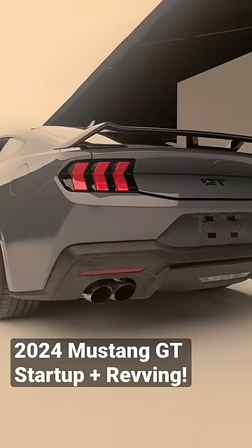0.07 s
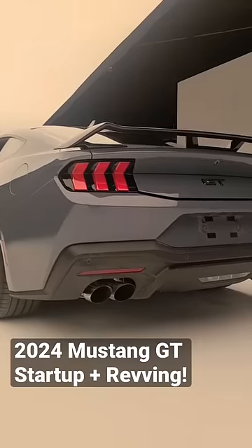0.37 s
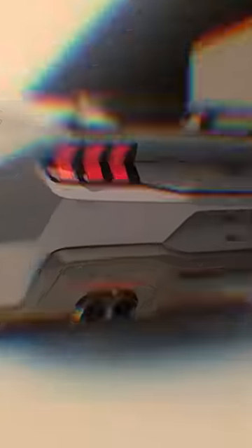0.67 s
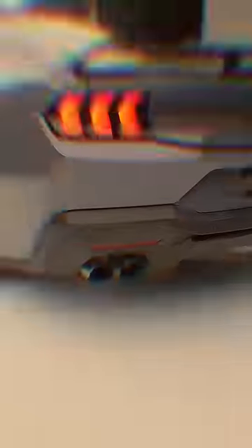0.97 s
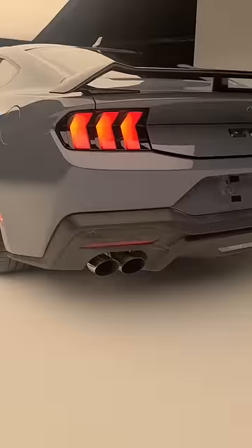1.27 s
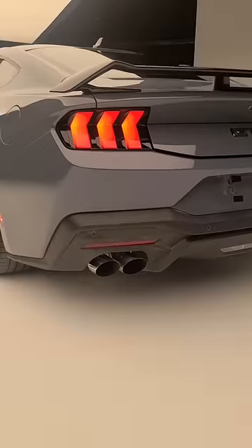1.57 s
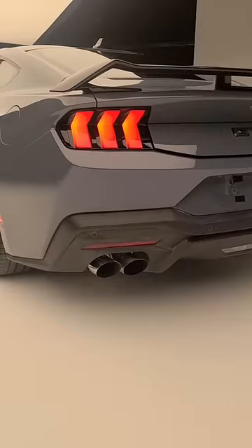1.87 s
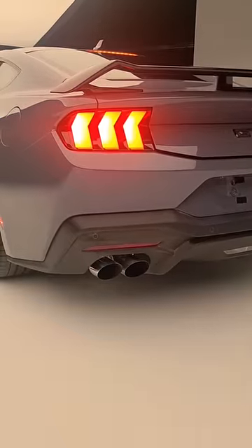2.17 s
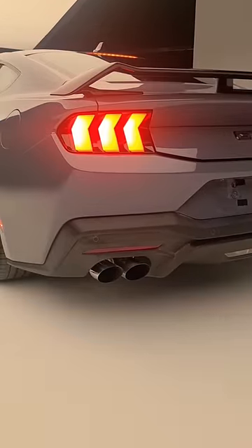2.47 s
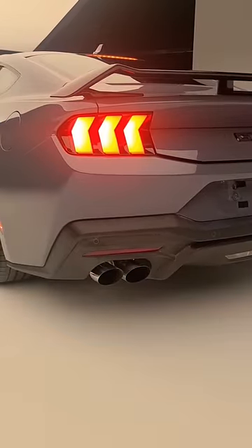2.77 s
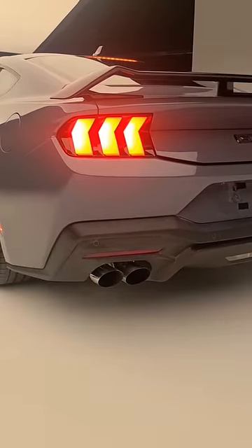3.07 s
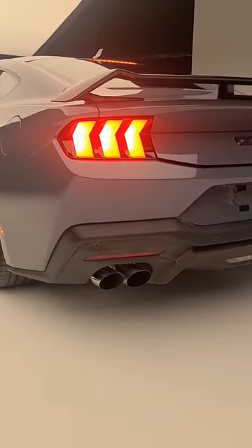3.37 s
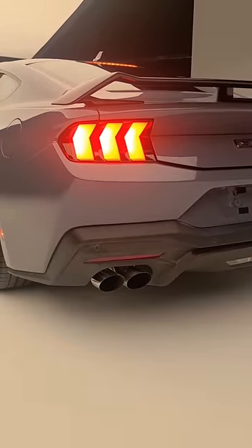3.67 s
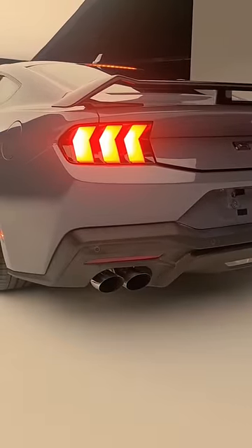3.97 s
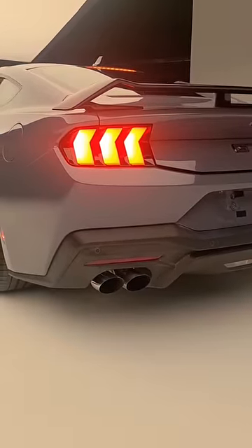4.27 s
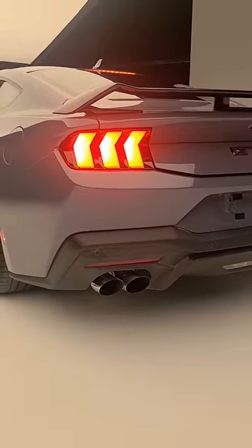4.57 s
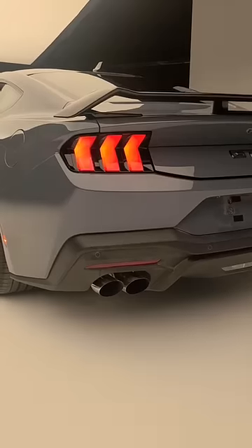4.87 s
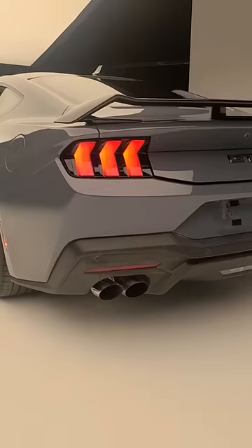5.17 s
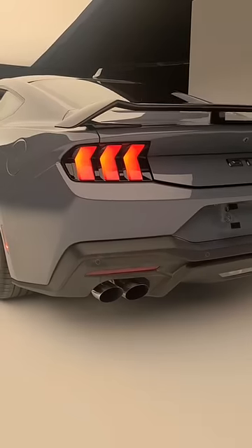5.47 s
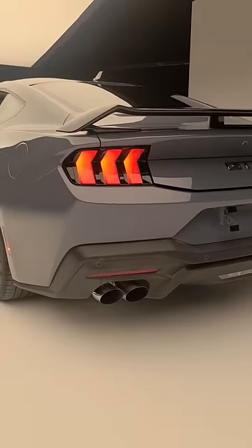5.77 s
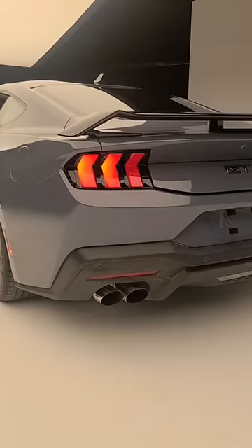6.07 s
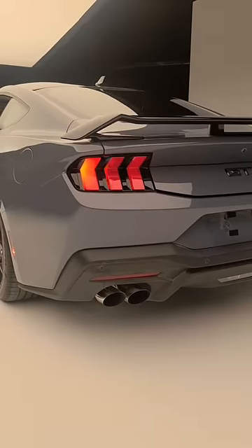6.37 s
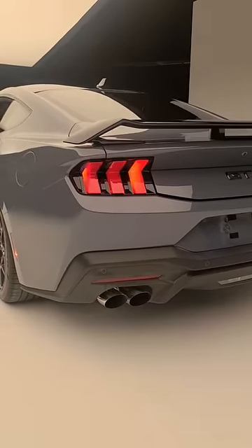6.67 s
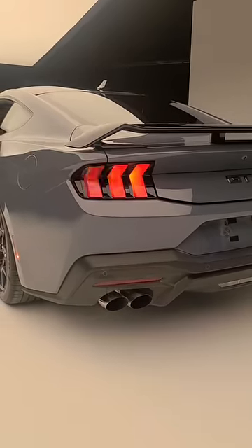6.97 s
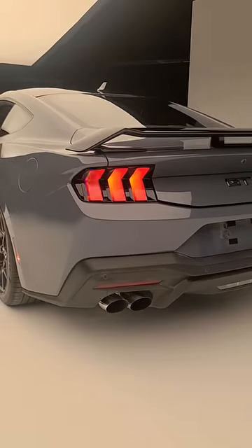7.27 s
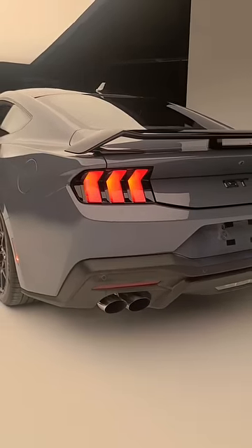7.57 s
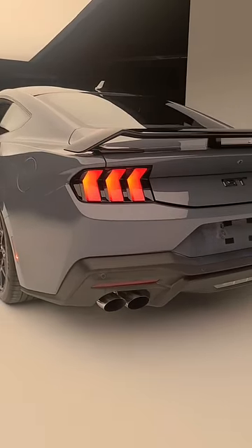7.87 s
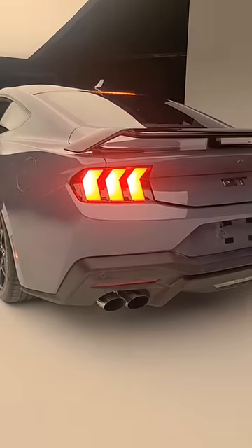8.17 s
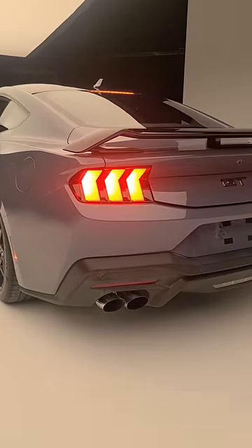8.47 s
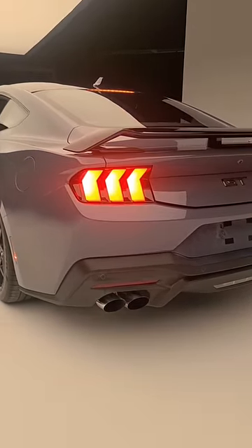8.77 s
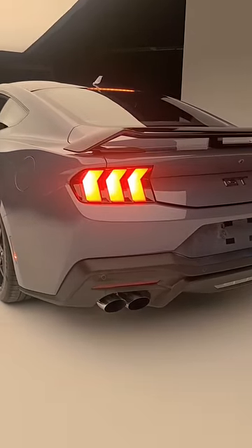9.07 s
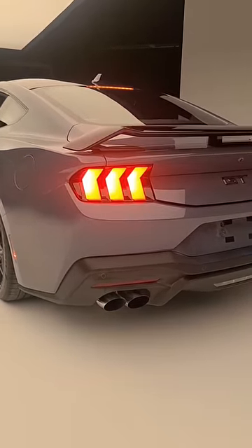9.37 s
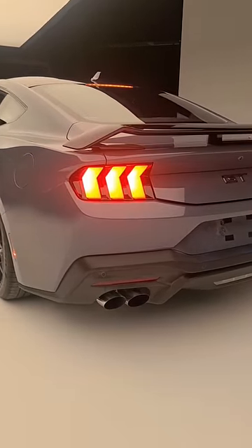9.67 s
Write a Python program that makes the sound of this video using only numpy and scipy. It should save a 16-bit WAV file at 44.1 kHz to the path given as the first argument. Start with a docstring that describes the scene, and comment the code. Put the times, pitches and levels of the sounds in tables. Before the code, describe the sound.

Heard from just behind the tailpipes indoors, a big car engine roars through three revs, each winding down with burbles and sharp pops.

```python
"""In a large hall, a V8 car is heard from just behind its tailpipes.
Its cold idle gives way to three revs, the second with a double press of the pedal. After each rev
the engine coasts down, burbling and popping. The pedal sets the engine's speed and load (how hard
it works), and these set how loud and how even the exhaust is. Uneven firing pulses make the
exhaust pipes ring, gas hisses out under load, and the hall echoes."""
import sys
import numpy as np
from scipy import signal
from scipy.fft import rfft, irfft
from scipy.io import wavfile
from scipy.ndimage import uniform_filter1d

SR = 44100
rng = np.random.default_rng(int(sys.argv[2]) if len(sys.argv) > 2 else 0)


def unload_wav(signal):
    """Save mono or channel-first audio to the path in sys.argv[1] as 16-bit WAV at rate SR, clipped to [-1, 1]."""
    wavfile.write(
        sys.argv[1],
        SR,
        np.round(np.clip(np.atleast_2d(signal).T, -1, 1) * 32767).astype(np.int16),
    )


N = 437913
TIME = np.arange(N) / SR

# Engine speed is counted in cycles per second (Hz). In one cycle, all eight cylinders fire once.
# Pedal presses: pressed_s, released_s, top_speed_hz, slowing_hz_per_s, effort_db, run_down_db,
# starting_pressure (0-1), engine_delay_s
PRESSES = [(1.185, 1.683, 43.5, 12.5, 0, 2, 0, 0.032), (5.836, 6.098, 14.4, 1.025, -1, 6.5, .2, 0),
           (6.192, 6.637, 33, 6, 0, 1.5, 0.65, 0), (7.055, 7.559, 50.4, 13.1, -0.5, 4, 0, .045)]
# The warm idle, the lowest speed the engine is allowed to fall to: time_s, speed_hz
WARM_IDLE_SPEED = [(4.9, 8.66), (5.4, 8.48)]
# The cylinders in firing order, the four on the near side strongest: strength_db, extra_travel_s
CYLINDER_PULSES = [(5.5, 0.0026), (-6, 0.0011), (0.5, 0.00055), (2.5, 0.0012), (-6.5, 0.00068),
                   (1.5, 0.00085), (-10.5, 0.0014), (-8, 0.0026)]
# Tone colours, which say how strong each pitch is in a sound: pitch_hz, level_db
DRONE_COLOUR = [(40, -26.5), (70, -3), (100, 0), (135, -3), (170, 1.5), (230, 1), (262, -11), (290, -18.5),
                (420, -40), (2000, -100)]  # the muffler's low hum
BARK_COLOUR = [(200, -27), (290, -12.5), (335, -0.5), (400, 1.5), (460, -8), (530, -8), (610, -11.5),
               (690, -14), (790, -32), (3000, -87.5)]  # the exhaust's middle voice
RASP_COLOUR = [(400, -36.5), (600, 1.5), (790, -8), (990, 4.5), (1150, -9), (1270, -0.5), (1390, 2.5),
               (1480, -3), (1620, -16), (1790, -4), (2020, -26.5), (2250, -15.5), (2700, -34), (5000, -35),
               (11000, -74.5)]  # ringing tailpipes
HISS_COLOUR = [(800, 1), (2000, 4.5), (3000, 2), (4300, 3.5), (6000, -2.5), (7500, -9.5), (9500, -5),
               (11800, 4.5), (13500, -0.5), (15500, -4), (16200, -14)]  # escaping gas
FLAME_COLOUR = [(300, -22.5), (800, -8.5), (1300, 11), (1750, -2), (2250, -3.5), (2700, -11.5), (3500, -9),
                (5500, -32), (9000, -34)]  # fuel burning in the pipe


def amp(db):
    """Turns decibels into a number to multiply a sound by."""
    return 10 ** (np.asarray(db) / 20)


def curve(rows, at=TIME, column=1):
    """Reads a table's column smoothly, by time or by another control."""
    rows = np.asarray(rows)
    return np.interp(at, rows[:, 0], rows[:, column])


def at_pitch(points, hz):
    """Reads a table by pitch, with the octaves evenly spaced."""
    pitch_hz, value = np.transpose(points)
    return np.interp(np.log(hz + 1), np.log(pitch_hz + 1), value)


def ramp(start_s, length_s):
    """Rises from 0 to 1 and stays there."""
    return np.clip((TIME - start_s) / length_s, 0, 1)


def unit(x):
    """Scales a sound to an average power of 1."""
    return x / np.sqrt(np.mean(x ** 2) + 1e-20)


def steady(x, size=4000):
    """Evens out slow changes in level; single pulses keep their shape."""
    power = np.mean(np.atleast_2d(x) ** 2, axis=0)
    smoothed = abs(uniform_filter1d(uniform_filter1d(power, size), size))
    return x / np.sqrt(smoothed + 1e-6 * power.mean())


def ring(x, colour, size=8192):
    """Gives a sound a tone colour, the way a pipe rings after a knock."""
    log_gain = np.log(amp(at_pitch(colour, abs(np.fft.fftfreq(size, 1 / SR)))))
    response = np.fft.ifft(np.exp(np.conj(signal.hilbert(log_gain)))).real[:size // 2]
    response = response / np.linalg.norm(response)
    return signal.oaconvolve(np.atleast_2d(x), response[None], axes=1)[:, :N]


def turbulence():
    """Swirling gas: white noise, half of it shared by both ears."""
    common, left, right = rng.standard_normal((3, N))
    return unit(common + np.array([left, right]))


def hall_echo():
    """Scattered reflections fade, each pitch at its own rate; the bass is alike at both ears."""
    # Time the echo takes to fall by 60 dB: pitch_hz, fade_s
    fade_times = [(60, 1.57), (300, 1.1), (1500, 0.3), (4000, 0.02), (8000, 0.43), (15000, 0.04)]
    # What differs between the ears, against what they share: pitch_hz, level_db
    width = [(50, -52), (150, -30.5), (350, -15.5), (700, -4), (2000, -11), (16000, -2.5)]
    reflections = rng.standard_normal((2, SR)) * (rng.random((2, SR)) < .06) * (TIME[:SR] > .004)
    hz, t, spectra = signal.stft(reflections, SR, nperseg=512)
    mid, side = spectra * amp(-60 * t / at_pitch(fade_times, hz)[:, None])
    side = side * amp(at_pitch(width, hz))[:, None]
    tail = signal.istft(np.array([mid + side, mid - side]), SR, nperseg=512)[1]
    tail *= 1 + 1.4 * np.exp(-TIME[:tail.shape[1]] / 0.015)  # floor and car body answer first
    return tail / np.linalg.norm(tail[0])


def place(x, hall, echo_db):
    """The direct sound reaches the left ear first; the hall's echo follows."""
    direct = np.vstack([x[0], np.pad(x[-1], (6, 0))[:N]])
    return direct + amp(echo_db) * signal.oaconvolve(x, hall, axes=1)[:, :N]


def air_whistle():
    """A faint, high whistle of air during the last run-down."""
    # The whistle's colour: pitch_hz, level_db
    colour = [(9000, -49), (11600, -13.5), (12450, -2.5), (13400, -14), (16000, -40)]
    return amp(-54) * ramp(9.3, 0.16) * unit(ring(rng.standard_normal((2, N)), colour))


def machine_whirr(cycle_hz):
    """Moving parts whirr louder as the engine speeds up."""
    # The whirr's colour: pitch_hz, level_db
    colour = [(300, -6), (1000, 9), (2400, -1.5), (3400, -3.5), (4500, -10.5), (6000, -11.5), (7400, -23),
              (12000, -16), (16000, -29)]
    return amp(-40.5 + 20.2 * np.log10(cycle_hz / 40)) * unit(ring(rng.standard_normal((2, N)), colour))


def gear_whirr(fuelled):
    """The gears whirr faintly while the engine gets fuel."""
    # The gears' colour: pitch_hz, level_db
    colour = [(1800, -38.5), (2600, -16), (2830, 0), (3050, -10), (3350, 0.5), (3530, -10), (3730, -2),
              (4100, -16), (6000, -33)]
    return amp(-65.5) * fuelled * unit(ring(turbulence(), colour))


def cycle_luck(cycle_hz):
    """Some cycles burn better than others: one random value a cycle, joined smoothly."""
    luck = np.clip(rng.standard_normal(600), -1.8, 1.3)
    return np.interp(np.cumsum(cycle_hz) / SR, np.arange(len(luck)), luck)


def firings(cycle_hz, ragged, scatter_db, jitter_s):
    """Eight pulses a cycle; the more ragged (0-1) the burning, the more their size and timing stray."""
    count = np.floor(8 * np.cumsum(cycle_hz) / SR).astype(int)
    at = np.flatnonzero(np.diff(count))
    strength_db, travel_s = np.array(CYLINDER_PULSES)[count[at] % 8].T
    luck, slip = np.clip(rng.standard_normal((4000, 2))[:len(at)], -2, 1.2).T
    contrast = 0.79 * np.minimum(cycle_hz[at] / 18, 1) ** 2  # cylinders are more alike at low speed
    size = amp(contrast * strength_db + scatter_db * ragged[at] * luck)
    wander_s = .0015 * np.maximum(1 - cycle_hz[at] / 36, 0)  # slow firings keep looser time
    delay_s = travel_s + (jitter_s * ragged[at] ** 2 + wander_s) * slip
    arrival = np.maximum(at + SR * delay_s, 0)
    return np.bincount(arrival.astype(int), size, N)[:N]


def puffs(pulses, decay_s, between, rise_s=0.00099):
    """Gas noise flares with each pulse, then falls back to the level `between`."""
    for lag_s in (rise_s, decay_s):
        pulses = signal.lfilter([1], [1, -np.exp(-1 / (SR * lag_s))], pulses + 1e-12)
    return (between + unit(pulses)) * turbulence()


def cold_idle(hall, idle_hz=6.72):
    """A deep firing tone, lumpy pipe pulses, three spits of gas a cycle and rattling valves."""
    # Colours of the cold pipe and of the valves: pitch_hz, level_db
    pipe_colour = [(25, -6), (50, 6), (120, 2.5), (200, -2), (310, -2), (410, -11), (480, -12.5), (570, -3),
                   (680, -16.5), (790, -32), (1400, -37), (2500, -44.5), (8000, -100)]
    valve_colour = [(300, -6.5), (1000, 3.5), (1500, 4), (1900, 6.5), (2300, -2.5), (3000, 3.5), (3400, 0),
                    (4500, -10), (6000, -12.5), (7400, -22.5), (9400, -13.5), (10200, -18.5), (12000, -13),
                    (16000, -28)]
    # Spits of gas in each cycle: time_into_cycle_s, level_db
    spit_pattern = [(0.038, -2), (.086, -3), (.141, -1)]
    # The idle fading away: time_s, level_db
    fade = [(.64, 0.5), (.79, -7), (.9, -13.5), (1.05, -12.5), (1.2, -36), (1.4, -100)]
    cycle_hz = idle_hz * (1 + 0.0029 * np.sin(2 * np.pi * 1.7 * TIME))
    firing_angle = 2 * np.pi * np.cumsum(8 * cycle_hz) / SR
    tone = amp(-10) * np.cos(firing_angle) - amp(-19) * np.cos(2 * firing_angle)
    ragged = np.full(N, .25)
    pulses = firings(cycle_hz, ragged, scatter_db=2.2, jitter_s=0.00063)
    pipe = amp(-21) * unit(place(ring(pulses, pipe_colour), hall, echo_db=0.81))
    into_s, spit_db = np.transpose(spit_pattern)
    at = SR * (np.arange(0, TIME[-1], 1 / idle_hz)[:, None] + into_s)
    sizes = amp(spit_db + 2.5 * rng.standard_normal(at.shape))
    spits = np.bincount(at.astype(int).ravel(), sizes.ravel(), N)[:N]
    spit = amp(-57) * unit(ring(puffs(spits, decay_s=.005, between=.3), HISS_COLOUR))
    taps = firings(cycle_hz, ragged, scatter_db=14, jitter_s=0.035)
    rattle = ring(puffs(taps, decay_s=0.0038, between=1), valve_colour)
    valves = amp(-45) * unit(place(rattle, hall, echo_db=-7))
    swell = np.exp(-((TIME - .662) / 0.04) ** 2)  # one short rush of hiss
    rush = amp(-43.5) * swell * unit(ring(turbulence(), HISS_COLOUR))
    return amp(curve(fade)) * (tone + pipe + spit + valves) + rush


def exhaust_pops(hall, flame_rise_s=0.00058, spit_rise_s=.002, spit_decay_s=0.0082):
    """Unburnt fuel bangs in the pipe: a thump, ringing tailpipes, a burst of flame and a spit of gas."""
    # The pops, with relative levels: start_s, bang_db, thump_db, flame_db, flame_decay_s, spit_db
    pops = [(1.128, -28, -17.5, -35, 0.0088, -36.5), (1.929, -37, -15.5, -38, .01, -52),
            (2.05, -34, -15, -36, .025, -47), (2.532, -27, -16, -31, 0.00868, -48),
            (2.61, -27, -12.5, -30, 0.0079, -44), (2.672, -36, -14.5, -42, 0.0081, -50),
            (2.794, -6, -10.5, -16.5, 0.0062, -31.5), (2.847, -9, -7.5, -13.5, 0.0064, -30),
            (2.956, -30, -15.5, -35, 0.0091, -47), (3.072, -29, -13.5, -34, 0.0087, -48),
            (3.17, -21, -14.5, -33, 0.0069, -45), (3.233, -9, -8.5, -13.5, 0.0086, -29.5),
            (3.27, -18, -16, -26, .012, -37), (3.329, -16, -15, -30, 0.0081, -38.5),
            (3.413, -9, -11, -14, 0.0055, -41), (3.502, -20, -20, -39, 0.0052, -37.5),
            (3.519, -27, -16.5, -32, 0.0054, -33.5), (3.574, -37, -16, -40, 0.0078, -46),
            (3.628, -28, -28, -37, 0.0061, -36.5), (3.648, -21, -13.5, -32, 0.022, -38.5),
            (3.705, -24, -16.5, -30, .006, -33.5), (3.768, -31, -26.5, -41, 0.0066, -37.5),
            (3.79, -21, -20.5, -32, 0.015, -45), (3.856, -19, -11, -24.5, 0.018, -38),
            (3.97, -36, -16.5, -39, .008, -51), (4.025, -25, -12.5, -32, 0.0093, -41.5),
            (4.043, -29, -11.5, -31, 0.028, -58), (4.203, -25, -25.5, -37, 0.012, -51),
            (4.55, -44, -30.5, -45, .006, -40.5), (5.924, -28, -15, -27, 0.0094, -24),
            (5.991, -27, -6.5, -24, 0.0067, -31), (6.066, -5.5, -19, -24, 0.0063, -28.5),
            (8.381, -19, -11.5, -25.5, 0.0082, -31), (8.424, -22, -14.5, -21.5, 0.0079, -32.5),
            (8.675, -26, -16, -28, 0.0084, -46), (8.703, -21, -20, -27, .008, -49),
            (8.88, -13, -17, -29, 0.0061, -48), (8.916, -27, -15, -28, 0.0061, -48),
            (8.989, -25, -16, -32, 0.0092, -41), (9.119, -24, -17, -35, 0.0073, -36),
            (9.277, -29, -16, -34, 0.0077, -44), (9.453, -27, -16.5, -33, .008, -41),
            (9.715, -19, -16.5, -33, 0.01, -52)]
    bangs, thumps, flames, spits = np.zeros((4, N))
    for start_s, bang_db, thump_db, flame_db, flame_decay_s, spit_db in pops:
        at = int(start_s * SR)
        t = TIME[:min(N - at, SR // 3)]
        span = slice(at, at + len(t))
        bangs[at], thumps[at] = amp(bang_db), amp(thump_db)
        flames[span] += amp(flame_db) * (1 - np.exp(-t / flame_rise_s)) * np.exp(-t / flame_decay_s)
        spits[span] += amp(spit_db) * (1 - np.exp(-t / spit_rise_s)) * np.exp(-t / spit_decay_s)
    thud = amp(22) * ring(thumps, BARK_COLOUR) + amp(19.5) * ring(thumps, DRONE_COLOUR)
    flame = flames * turbulence()
    pipes = ring(amp(13) * bangs + amp(1) * flame[0], RASP_COLOUR)
    crack = pipes + amp(-1.5) * ring(flame, FLAME_COLOUR) + ring(spits * turbulence(), HISS_COLOUR)
    return place(thud, hall, echo_db=-12) + place(crack, hall, echo_db=-17)


def engine_speed(top_hold_s=.057):
    """Each press spins the engine up ever faster; friction then slows it evenly, never below idle."""
    cycle_hz = 28.44 - 3 * TIME  # already slowing before the first press
    for pressed_s, released_s, top_hz, slowing, *_, delay_s in PRESSES:
        start_s = pressed_s + delay_s
        climb = ramp(start_s, released_s - top_hold_s - start_s) ** 1.25
        before = np.where(TIME < start_s, cycle_hz, np.interp(start_s, TIME, cycle_hz))
        cycle_hz = before + climb * (top_hz - before) - slowing * np.maximum(TIME - released_s, 0)
        cycle_hz = np.maximum(cycle_hz, curve(WARM_IDLE_SPEED))
    return cycle_hz


def pedal(open_s=0.081, shut_s=0.13, burble_delay_s=.68, run_down_fade_s=7.3):
    """A press builds load and pipe pressure; after the release, coasting and burbling build (all 0-1)."""
    load, pressure, coasting, level_db = np.zeros((4, N))
    burbling = np.ones(N)
    for pressed_s, released_s, _, _, effort_db, run_down_db, start_pressure, _ in PRESSES:
        opened, shut = ramp(pressed_s, open_s), ramp(released_s, shut_s)
        load = np.maximum(load, opened * (1 - shut))
        rising = start_pressure + (1 - start_pressure) * ramp(pressed_s, released_s - pressed_s)
        pressure = np.where(TIME < pressed_s, pressure, rising)
        coasting = coasting * (1 - opened) + ramp(released_s, length_s=1)
        burbling = burbling * (1 - opened) + ramp(released_s + burble_delay_s, length_s=0.1)
        after_db = run_down_db * (1 - ramp(released_s, run_down_fade_s))
        level_db += opened * (effort_db + shut * (after_db - effort_db) - level_db)
    return load, pressure, coasting, burbling, level_db


def burning(cycle_hz, load, burbling, fuel_lag_s=0.067):
    """Fuel burns evenly under load and at idle; while coasting, the cylinders fire raggedly."""
    # How unevenly a burbling engine fires: speed_hz, raggedness (0-1)
    burble_raggedness = [(20, .88), (30, 0.76), (40, 0.66)]
    ragged_fuelled, ragged_spinning = 0.25, 0.54
    keep = np.exp(-1 / (SR * fuel_lag_s))
    wanted = np.maximum(load, cycle_hz <= curve(WARM_IDLE_SPEED))
    fuelled = np.maximum(load, signal.lfilter([1 - keep], [1, -keep], wanted))
    stumbling = np.maximum(burbling, np.clip((35 - cycle_hz) / 5, 0, 1))  # a slower engine stumbles
    ragged_coasting = ragged_spinning + stumbling * (curve(burble_raggedness, cycle_hz) - ragged_spinning)
    return fuelled, np.clip(fuelled * ragged_fuelled + (1 - fuelled) * ragged_coasting, 0, 1)


def exhaust_levels(cycle_hz, load, pressure, coasting, fuelled):
    """Speed and load set the levels (dB) of the exhaust's five voices, which waver from cycle to cycle."""
    # Relative levels, pedal down and pedal up: speed_hz, burble_db, drone_db, bark_db, rasp_db, hiss_db
    pedal_down = [(10.1, -20.5, -12.5, -28.5, -35.5, -41.5), (14.2, -26, -20, -17.5, -26.5, -36),
                  (27.6, -29, -15.5, -16.5, -23.5, -34), (37.4, -25, -15.5, -19, -20, -25.5),
                  (47.5, -20, -16, -19, -18.5, -24.5)]
    pedal_up = [(8.8, -21, -27.5, -27.5, -49.5, -71), (12.9, -21, -21.5, -23, -47.5, -67.5),
                (20.8, -18.5, -23, -25, -43, -60), (34.6, -20.5, -21.5, -23, -37, -61.5),
                (45.5, -23.5, -24, -22, -36.5, -63)]
    burble_db, drone_db, bark_db, rasp_db, hiss_db = (
        load * curve(pedal_down, cycle_hz, k) + (1 - load) * curve(pedal_up, cycle_hz, k)
        for k in range(1, 6))
    low_pressure = load * (1 - pressure) ** 2  # rasp and hiss swell as pressure builds
    dip_db = 6 * (1 - load) * (1 - coasting)  # the level dips just after a release
    luck = cycle_luck(cycle_hz)
    sputter_db = 2.5 * (1 - fuelled) * luck
    return (burble_db - dip_db - 5.5 * fuelled,
            drone_db + 0.2 - 0.29 * dip_db + 0.48 * sputter_db,
            bark_db + 0.75 - 0.49 * dip_db + sputter_db,
            rasp_db + 0.85 - .5 * dip_db - 3 * low_pressure + 0.7 * sputter_db,
            hiss_db + 5 - dip_db - 13.5 * low_pressure + 1.2 * load * luck)


def gas_hiss(pulses, hiss_db, hall):
    """Each firing pushes a hissing puff of gas out of the tailpipes."""
    gas = puffs(pulses ** 0.89, decay_s=0.0033, between=0.22)
    return place(amp(hiss_db) * steady(ring(gas, HISS_COLOUR)), hall, echo_db=-12.5)


def pipe_boom(cycle_hz, angle, fuelled):
    """At low speed the pipe booms along with the firings, as long as fuel flows."""
    # Strength of the boom: speed_hz, level_db
    boom_levels = [(8.5, -17.5), (13, -14), (22, -14.5), (30, -30.5), (40, -95)]
    tone = np.cos(8 * angle) + amp(-13) * (np.cos(14 * angle) + np.cos(15 * angle))
    return fuelled * amp(curve(boom_levels, cycle_hz)) * np.sqrt(2) * tone


def low_burble(cycle_hz, ragged, fuelled, hall):
    """Stumbling firings ring the exhaust's deepest notes."""
    # The burble's colour: pitch_hz, level_db
    colour = [(20, -20.5), (38, -0.5), (50, 15.5), (63, 16), (80, 4.5), (120, 6), (220, -47.5),
              (1500, -100)]
    stumbles = firings(cycle_hz, np.maximum(ragged, .8 * (1 - fuelled)), scatter_db=16.4, jitter_s=0.0047)
    return steady(place(ring(stumbles, colour), hall, echo_db=-0.78))


def tailpipe_rasp(pulses, cycle_hz, ragged, load, hall):
    """Under load the pulses sharpen into shock waves that ring the tailpipes and tear the air."""
    tearing = .03 + .8 * ragged + ((14 - 5 * load) / cycle_hz) ** 2
    torn_air = steady(puffs(pulses, decay_s=.004, between=.8 - .5 * load))
    shocks = steady(pulses ** (1.1 + .7 * load)) + tearing * torn_air
    ringing = ring(shocks, RASP_COLOUR) + amp(-9) * load * ring(shocks, FLAME_COLOUR)
    return steady(place(ringing, hall, echo_db=-7.5))


def engine_tones(cycle_hz, angle, load):
    """Pure tones at multiples of the engine speed, in step with the strong cylinders."""
    # The tones: multiple_of_speed, loaded_db, coasting_db
    tone_levels = [(2, 1, -5), (3, -5, -4), (4, -3, -3), (5, 3, 0), (6, 1, 5), (7, 0, -4), (8, 0, -5),
                   (9, 3, 4), (10, -6, -3), (11, 2, -2), (12, -2, -8), (13, -3, -12), (14, 0, -7),
                   (15, -1, -5), (16, -6, -7), (17, -4, -7), (18, -6, -8)]
    strength_db, travel_s = np.transpose(CYLINDER_PULSES)
    place_in_cycle = np.arange(8) / 8 + travel_s * cycle_hz.mean()
    waver = 1 - .5 * load  # level and timing waver less under load
    tones = []
    for multiple, loaded_db, coasting_db in tone_levels:
        db = coasting_db + load * (loaded_db - coasting_db) + 4.5 * waver * cycle_luck(cycle_hz / 4)
        phase = np.angle(amp(strength_db) @ np.exp(-2j * np.pi * multiple * place_in_cycle))
        slip = .6 * waver * cycle_luck(cycle_hz / 2)
        tones.append((multiple, amp(db) * np.cos(multiple * angle + phase + slip)))
    return tones


def exhaust_note(cycle_hz, ragged, gas, tones, colour, hall):
    """Fast, even firing blends into clean tones; slow or ragged firing stays lumpy."""
    clean_share = np.clip(1.15 * (1 - ragged) * np.clip(cycle_hz / 20 - .6, 0, 1), 0, .87)
    # each tone swells as it passes a pitch at which the pipe rings
    swept = sum(wave * np.interp(TIME, TIME[::64], amp(at_pitch(colour, multiple * cycle_hz[::64])))
                for multiple, wave in tones)
    clean = steady(place(swept[None], hall, echo_db=-13.5))
    lumpy = steady(place(ring(gas, colour), hall, echo_db=-1.2), size=6000)
    return np.sqrt(clean_share) * clean + np.sqrt(1 - clean_share) * lumpy


def drone_and_bark(pulses, cycle_hz, angle, ragged, load, hall, dull_above_hz=393):
    """The firings make the muffler drone and the pipes bark; fast, hot gas lifts the bark's ring."""
    # The bark's colour with hot gas: pitch_hz, level_db
    hot_colour = [(200, -30.5), (290, -13), (340, 1.5), (400, 1.5), (460, 0.5), (540, -1), (620, -10),
                  (700, -10), (800, -31), (3000, -78)]
    # Without load, softer pulses lose the top of the bark: speed_hz, share_lost (0-1)
    dulling = [(8.5, 0.74), (15, 0.69), (40, 0.17)]
    trailing = 3 / cycle_hz + 0.44 * ragged  # slow pulses trail swirling gas
    gas = steady(pulses) + trailing * steady(puffs(pulses, decay_s=0.0038, between=0.07)[0])
    tones = engine_tones(cycle_hz, angle, load)
    drone, bark, hot_bark = (exhaust_note(cycle_hz, ragged, gas, tones, colour, hall)
                             for colour in (DRONE_COLOUR, BARK_COLOUR, hot_colour))
    top = signal.sosfiltfilt(signal.butter(5, dull_above_hz, "high", fs=SR, output="sos"), bark)
    heat = load * np.clip((cycle_hz - 22) / 12, 0, 1)
    return drone, bark + heat * (hot_bark - bark) - curve(dulling, cycle_hz) * (1 - load) * top


def idle_throb(cycle_hz, angle, peak_s=4.933):
    """A slow engine swells in level once a cycle; one swell falls at peak_s."""
    slow = np.clip(2 - cycle_hz / 8, 0, 1)
    swell = np.cos((angle - np.interp(peak_s, TIME, angle)) / 2) ** 4
    return amp(7.5 * slow * (swell - 0.45))


def revs(hall):
    """The pedal works the engine; one stream of firings drives its drone, bark, rasp and hiss."""
    cycle_hz = engine_speed()
    angle = 2 * np.pi * np.cumsum(cycle_hz) / SR
    load, pressure, coasting, burbling, level_db = pedal()
    fuelled, ragged = burning(cycle_hz, load, burbling)
    burble_db, drone_db, bark_db, rasp_db, hiss_db = exhaust_levels(
        cycle_hz, load, pressure, coasting, fuelled)
    throb = idle_throb(cycle_hz, angle)
    pulses = firings(cycle_hz, ragged, scatter_db=8.5, jitter_s=0.00076)
    boom = pipe_boom(cycle_hz, angle, fuelled)
    burble = amp(burble_db) * low_burble(cycle_hz, ragged, fuelled, hall)
    drone, bark = drone_and_bark(pulses, cycle_hz, angle, ragged, load, hall)
    drone *= amp(drone_db) * throb ** 0.39
    bark *= amp(bark_db) * throb
    rasp = amp(rasp_db) * np.sqrt(throb) * tailpipe_rasp(pulses, cycle_hz, ragged, load, hall)
    hiss = gas_hiss(pulses, hiss_db, hall)
    roar = amp(level_db) * (drone + rasp + hiss + machine_whirr(cycle_hz))
    fade_in = ramp(0.51, 0.24)
    return fade_in * (boom + burble + bark + gear_whirr(fuelled) + roar)


def scene():
    """All of the engine's sounds in one hall."""
    hall = hall_echo()
    return cold_idle(hall) + revs(hall) + exhaust_pops(hall) + air_whistle()


def record(dry, lowest_hz=12, highest_hz=16000):
    """Leans the middle pitches to the right, rounds off peaks and trims the lowest and highest sound."""
    # The left ear's level against the right: pitch_hz, level_db
    ear_balance = [(60, -0.6), (250, -0.5), (500, -3), (1000, -2), (4000, -2), (12000, 1)]
    hz = np.fft.rfftfreq(N, 1 / SR)
    lean_db = at_pitch(ear_balance, hz) / 2
    heard = irfft(rfft(dry) * amp([lean_db, -lean_db]) * np.minimum(hz / lowest_hz, 1), N)
    rounded = heard / (1 + heard ** 8) ** (1 / 8)
    treble_cut = signal.firwin(511, highest_hz, window=("kaiser", 9), fs=SR)
    return signal.oaconvolve(rounded, treble_cut[None], "same")


dry = scene()
out = record(dry)
unload_wav(out)
```